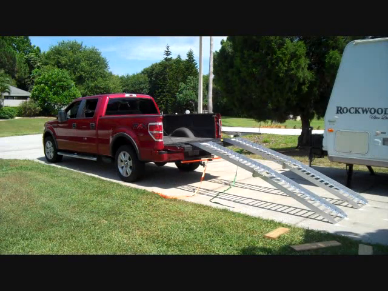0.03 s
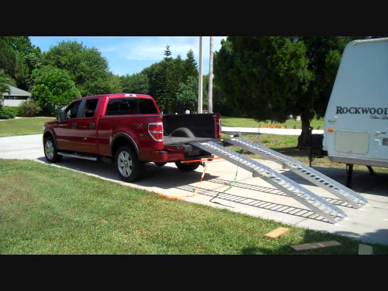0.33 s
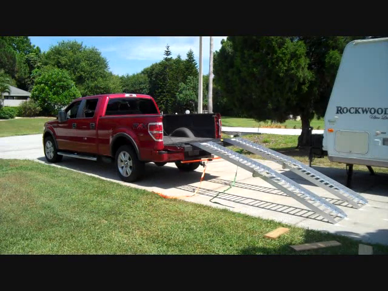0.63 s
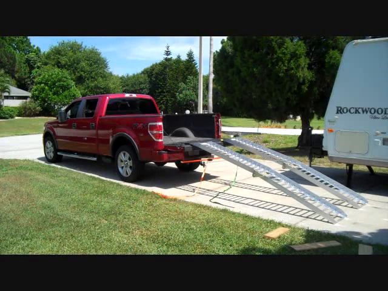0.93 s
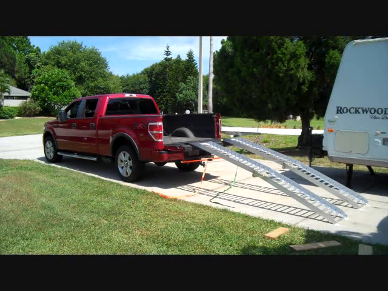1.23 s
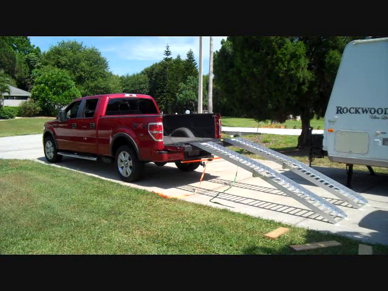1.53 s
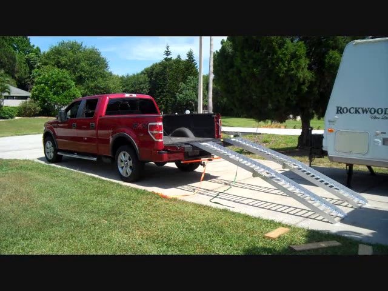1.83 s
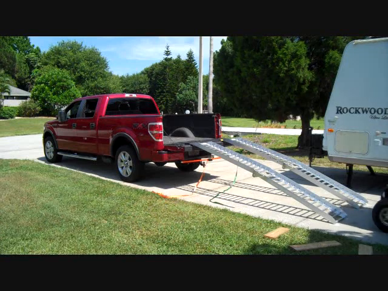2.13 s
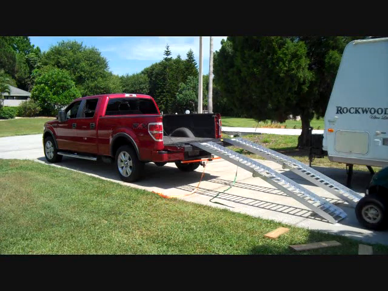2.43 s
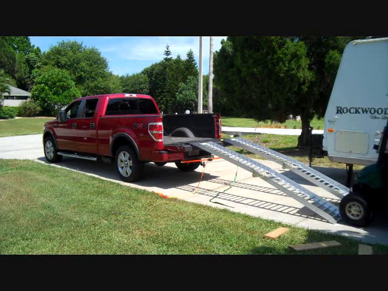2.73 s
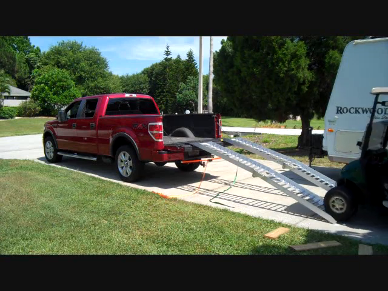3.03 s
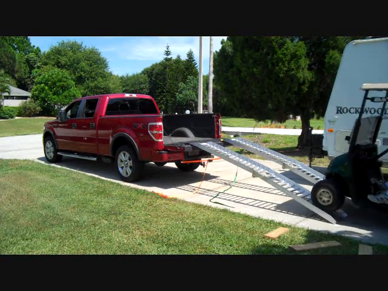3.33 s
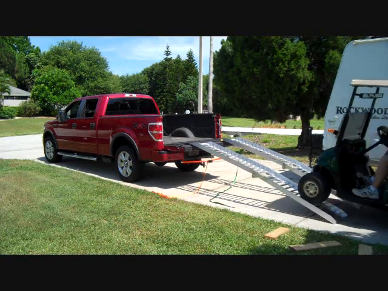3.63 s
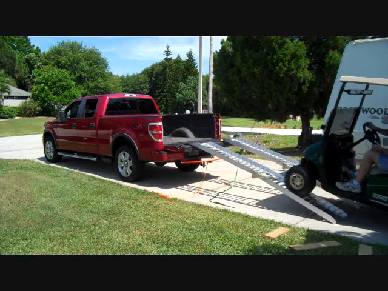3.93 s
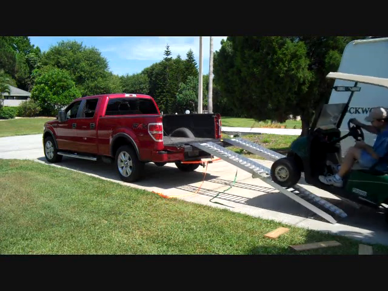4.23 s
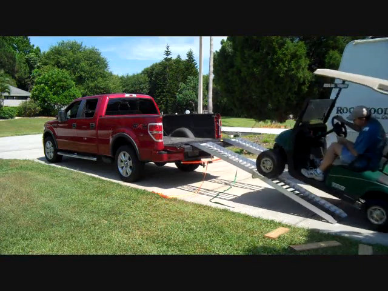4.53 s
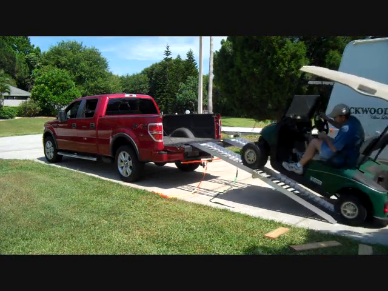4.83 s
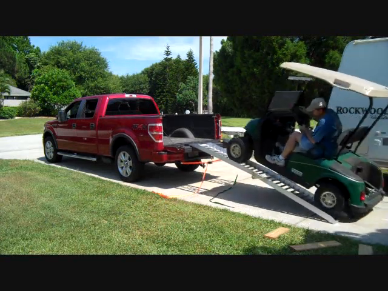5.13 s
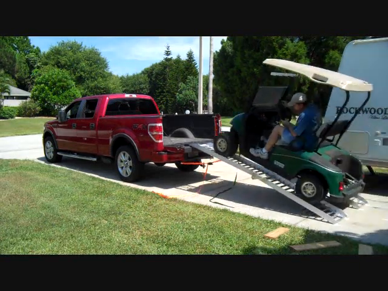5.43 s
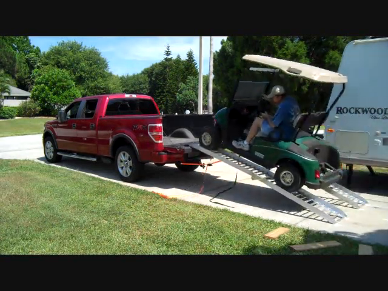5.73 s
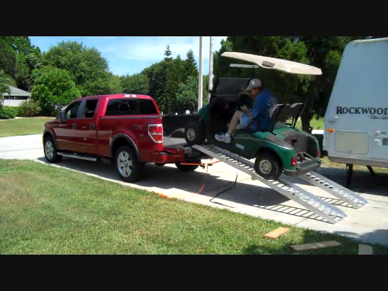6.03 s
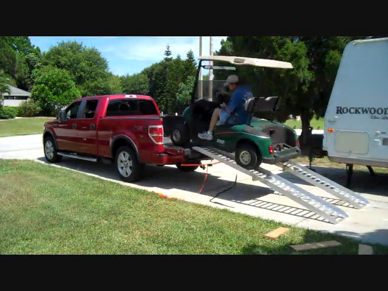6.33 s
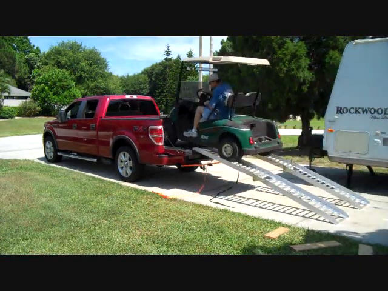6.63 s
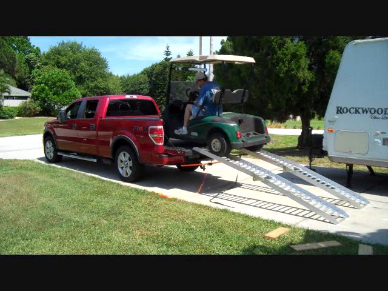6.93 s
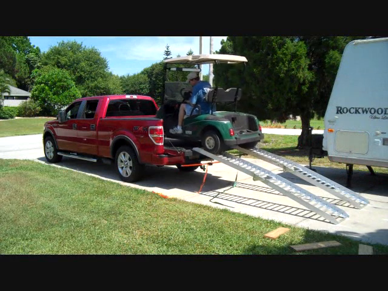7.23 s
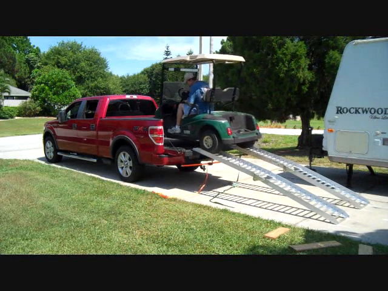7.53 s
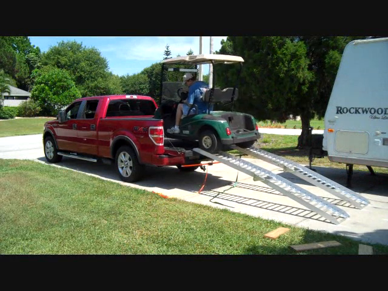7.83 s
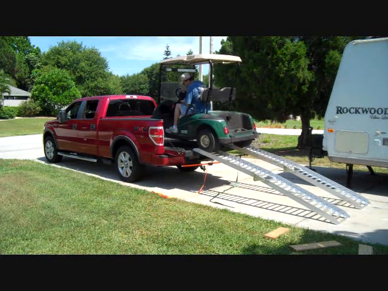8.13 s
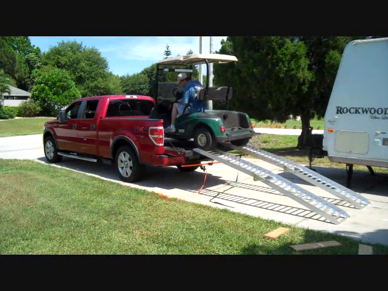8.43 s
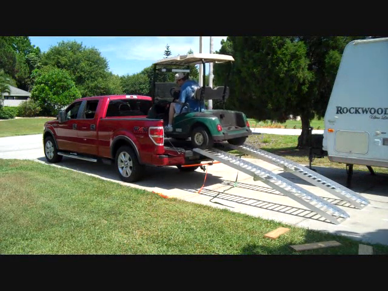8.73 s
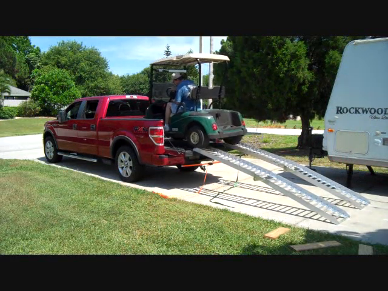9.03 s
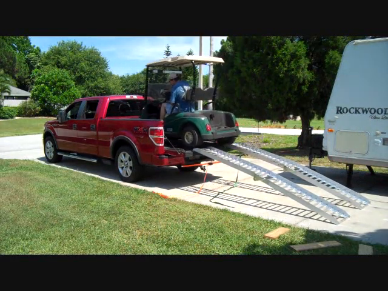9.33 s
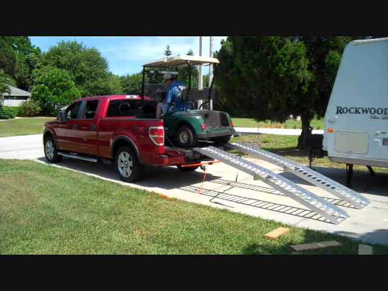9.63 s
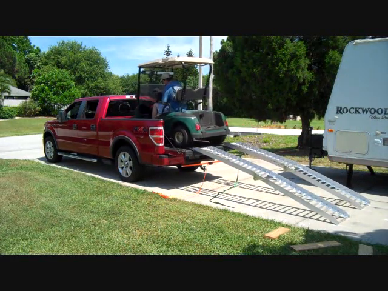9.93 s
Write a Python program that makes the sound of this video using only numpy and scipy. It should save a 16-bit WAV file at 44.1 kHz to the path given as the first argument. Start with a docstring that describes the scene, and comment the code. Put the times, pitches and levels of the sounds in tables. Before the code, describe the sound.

Outdoors, a brake pedal clicks off over a steady hiss and faint bird chirps. Tyres roll softly, then an electric golf cart hits metal ramps with a ringing clatter. Light rattles follow as it climbs, and wind rumbles and thumps on the microphone. The ramps then scrape and knock under the load several times, ending with a clank and a small pedal click.

```python
"""An electric golf cart climbs two aluminium ramps into a pickup bed on a breezy driveway.
The brake clacks off and the tyres roll; impacts excite the modes of rungs and rails, which clatter,
clang and hum, and stick-slip friction makes the loaded ramps scrape. Turbulent gusts buffet the two
microphone ports, and birds call in gliding tones over a steady outdoor hiss."""
import sys
import numpy as np
from scipy import signal
from scipy.fft import rfft, irfft, next_fast_len
from scipy.io import wavfile

SR = 44100
rng = np.random.default_rng(int(sys.argv[2]) if len(sys.argv) > 2 else 0)


def materialize(psi):
    """Save the field psi as 16-bit PCM at rate SR to the path in sys.argv[1].

    A 1-D psi becomes a single channel; in a 2-D psi each row is a channel.
    """
    bounded = np.clip(np.atleast_2d(psi).T, -1, 1)
    quanta = np.round(bounded * 32767).astype(np.int16)
    wavfile.write(sys.argv[1], SR, quanta)


N = 440559
T = np.arange(N) / SR


def from_db(db):
    """Amplitude grows tenfold every 20 dB. Table levels are relative, ahead of each source's gain."""
    return np.exp(np.asarray(db) * (np.log(10) / 20))


def unit_rms(x):
    """Normalisation to a mean power of one."""
    return x / np.sqrt(np.mean(x ** 2) + 1e-20)


def in_time(rows, column=1):
    """Linear interpolation of one column at every sample."""
    return np.interp(T, np.array(rows)[:, 0], np.array(rows)[:, column])


def at_hz(points, hz):
    """Interpolation on a log-frequency axis."""
    return np.interp(np.log(hz + 1e-6), np.log(np.array(points)[:, 0]), np.array(points)[:, 1])


def panned(pan_db):
    """Constant-power panning: two gains from the pan, the level of left over right."""
    ratio = np.atleast_1d(from_db(pan_db))
    return np.array([ratio, np.ones_like(ratio)]) / np.sqrt(1 + ratio ** 2)


def drift(corner_hz):
    """Low-pass filtered noise: a smooth random fluctuation of unit rms."""
    pole = np.exp(-40 * np.pi * corner_hz / SR)  # at one twentieth of the sample rate
    slow = signal.lfilter([1], [1, -2 * pole, pole * pole], rng.standard_normal(N // 20 + 2002))[2000:]
    return np.interp(np.arange(N) / 20, np.arange(len(slow)), unit_rms(slow))


def held(start, length, rise_s, fall_s):
    """Linear attack, hold and exponential decay: an envelope's sample indices and heights."""
    at = np.arange(max(int(start * SR), 0), min(int((start + length) * SR) + SR // 3, N))
    age = T[at] - start
    return at, np.clip(age / rise_s, 0, 1) * np.exp(-np.maximum(age - length, 0) / fall_s)


def contacts(per_s, spread_db):
    """Shot noise: tiny metal contacts of uneven size arrive as a Poisson process."""
    sizes = from_db(spread_db * np.minimum(rng.exponential(1, N), 4)) * rng.choice([-1, 1], N)
    return unit_rms(sizes * (rng.random(N) < per_s / SR))


def impact_force(rows, rise_s):
    """Contact force builds as the metal beds in, then decays; overlapping impacts add in power."""
    power = np.zeros(N)
    for start, db, decay_s in rows:
        at = int(start * SR)
        t = T[:min(SR // 2, N - at)]
        shape = (1 - np.exp(-t / rise_s)) * np.exp(-t / decay_s)
        power[at:at + len(t)] += (from_db(db) * shape / shape.max()) ** 2
    return np.sqrt(power)


def resonate(drive, t60, tail_db, tail_t60, modes=(), modes_db=0):
    """Convolution with two random impulse responses: dense ring, any clear modes, outdoor tail."""
    t = T[:SR]
    dense = unit_rms(rng.standard_normal((2, SR)) * from_db(-60 * t / t60))
    tail = unit_rms(rng.standard_normal((2, SR)) * from_db(-60 * t / tail_t60))
    clear = np.zeros((2, SR))
    for hz, db, mode_t60 in modes:
        clear += from_db(db - 60 * t / mode_t60) * np.sin(2 * np.pi * (hz * t + rng.random((2, 1))))
    response = unit_rms(dense + from_db(modes_db) * unit_rms(clear) + from_db(tail_db) * tail)
    return signal.fftconvolve(drive[None], response / np.sqrt(SR), axes=1)[:, :N]


def at_ports(pair, spectrum, direction):
    """Partial coherence: two independent signals are coloured and blended into left and right."""
    size = next_fast_len(N + SR // 10)
    hz = np.arange(size // 2 + 1) * SR / size
    pan_db, coherence, phase = (at_hz(table, hz) for table in direction)
    common, separate = rfft(pair, size)
    left_gain = from_db(pan_db) * np.exp(1j * phase)
    left = left_gain * (coherence * common + np.sqrt(1 - coherence ** 2) * separate)
    mid_gain = np.sqrt(1 + abs(left_gain) ** 2 + 2 * coherence * left_gain.real) / 2
    colour = unit_rms(from_db(at_hz(spectrum, hz))) / mid_gain  # the ports' mean keeps the level
    return irfft(colour * np.array([left, common]), size)[:, :N]


# Sound from all around. Each row: frequency in Hz, then in turn pan in dB, coherence from 0 to 1,
# or phase lead of the left port in radians.
AMBIENT_PAN = [(300, -0.5), (1500, -1.5), (4000, -4.5), (6200, -11.5), (7200, 1), (8300, 15.5), (10000, 8),
               (14000, 0.5)]
AMBIENT_COHERENCE = [(150, .2), (700, .75), (2000, .45), (4000, .33), (8000, .38), (11000, .1)]
AMBIENT_PHASE = [(600, 0), (2000, -1.6), (4000, -3), (7500, -2.8), (9000, -5.5)]
FROM_AROUND = (AMBIENT_PAN, AMBIENT_COHERENCE, AMBIENT_PHASE)
# The strength of the hiss. Each row: time in seconds, level in dB.
HISS_LEVEL = [(0, -45), (1.2, -44), (1.8, -42.5), (3.5, -41.5), (5.3, -42), (5.6, -42.5), (6.1, -39.5),
              (8.3, -45), (9.99, -43)]
# Its colour. Each row: frequency in Hz, spectral density in dB.
HISS_SPECTRUM = [(24, -25), (40, -5), (107, -2), (171, -7), (506, -5.5), (983, -5), (1140, -10),
                 (1910, -13), (3810, -11.5), (6230, -5), (8170, -4.5), (9240, -10), (11800, -30),
                 (13400, -26.5), (14400, -37)]


def outdoor_hiss():
    """Broadband ambient noise reaches the ports partly coherent, its level wavering slightly."""
    level_db = in_time(HISS_LEVEL) + .45 * drift(6)
    return at_ports(rng.standard_normal((2, N)) * from_db(level_db), HISS_SPECTRUM, FROM_AROUND)


# Lone whistles. Each row: start in seconds, level in dB, then the note: length in seconds,
# first pitch, last pitch and trill depth in Hz.
LONE_WHISTLES = [(.86, -47, .12, 3520, 3520, 0), (1.001, -45, .035, 3100, 2860, 250),
                 (8.81, -47, 0.071, 2520, 2365, 0)]
# One bird's buzzy calls. Each row: start in seconds, level in dB.
BUZZ_CALLS = [(0, -47.5), (.508, -44), (.69, -43.5)]
# Its two simultaneous voices. Each row: a note as above.
BUZZ_NOTES = [(.066, 4660, 4400, 230), (.066, 3840, 3650, 200)]
# A warbler swoops down and up in turn. Each row: start and end in seconds, first level in dB.
WARBLE_PHRASES = [(5.075, 5.46, -40), (6.027, 6.2, -35)]
# A third bird chirps in threes. Each row: start in seconds, level in dB.
CHIRP_TRIPLETS = [(8.162, -47.5), (8.912, -44.5)]
DOWNSWOOP, UPSWOOP, CHIRP = (0.01, 4000, 2850, 0), (0.01, 3617, 4080, 0), (0.0594, 3100, 2870, 70)


def bird_notes(warble_period_s=.109, growth_db_per_s=12, upswoop_delay_s=.06, chirp_period_s=.087):
    """Periodic repetition builds phrases from notes; the rows are laid out like the whistles."""
    notes = list(LONE_WHISTLES) + [(s, db, *voice) for s, db in BUZZ_CALLS for voice in BUZZ_NOTES]
    for start, end, first_db in WARBLE_PHRASES:
        for s in np.arange(start, end, warble_period_s):
            db = first_db + growth_db_per_s * (s - start)
            notes += [(s, db, *DOWNSWOOP), (s + upswoop_delay_s, db - 3, *UPSWOOP)]
    return notes + [(s + k * chirp_period_s, db, *CHIRP) for s, db in CHIRP_TRIPLETS for k in range(3)]


def birds(trill_per_s=75, waver_hz=45):
    """Frequency modulation makes tones glide, waver and trill; scattering in the trees blurs them."""
    song, waver = np.zeros(N), waver_hz * drift(127)
    for start, db, length, first_hz, last_hz, trill_hz in bird_notes():
        at, progress = int(start * SR), np.linspace(0, 1, int(length * SR))
        note = slice(at, at + len(progress))
        glide = first_hz + (last_hz - first_hz) * progress
        trill = trill_hz * signal.sawtooth(2 * np.pi * trill_per_s * length * progress)
        cycles = np.cumsum(glide - trill + waver[note]) / SR
        song[note] += from_db(db) * np.sqrt(abs(np.sin(np.pi * progress))) * np.sin(2 * np.pi * cycles)
    trees = resonate(song, t60=0.076, tail_db=3, tail_t60=0.5)
    return from_db(4) * panned(-0.5) * (song + from_db(-1) * trees)


# The light breeze. Each row: time in seconds, level in dB, pan in dB.
BREEZE_LEVEL = [(0, -49.5, -13), (1.1, -55, 0), (2.3, -62.5, 0), (4.7, -60.5, -3), (5.4, -47, -14),
                (6.6, -43, -12), (7.15, -35, -14), (7.45, -50.5, -13), (8.4, -47, -21), (9.1, -62, -10),
                (9.9, -50, -20)]
# Gusts on the ports. Each row: start and length in seconds, level in dB, pan in dB.
WIND_GUSTS = [(0, 0.019, -43, -7), (.46, .05, -40, -4), (0.563, 0.056, -34, -3), (1.373, 0.14, -45.5, 12),
              (1.78, 0.087, -38, -5), (1.86, 0.18, -39, 23), (2.53, 0.037, -36, -7), (2.69, 0.13, -44, 23),
              (2.99, .09, -42, 1), (3.19, .11, -42, -5), (3.46, .03, -44, -9), (3.606, .13, -43.5, 4),
              (4.048, .07, -37, -0.5), (4.881, 0.058, -38, -24), (5.031, .11, -29.5, -6),
              (5.19, .19, -23, -7), (5.361, 0.24, -20.8, -6), (5.68, .18, -23.2, -8.5),
              (5.948, .11, -30.5, -29), (6.06, .11, -26, -31), (6.285, 0.16, -35.5, -8),
              (6.915, 0.29, -26.5, -13.5), (7.639, 0.13, -35.5, -16), (8.185, 0.27, -26, -32)]


def wind_pressure(swing_db=3, lull_hz=4.5):
    """Incoherent addition: gusts and a wandering breeze sum in power at each port."""
    lulls_db = swing_db * np.array([drift(lull_hz), drift(lull_hz)])
    power = (from_db(in_time(BREEZE_LEVEL) + lulls_db) * panned(in_time(BREEZE_LEVEL, column=2))) ** 2
    for start, length, db, pan_db in WIND_GUSTS:
        at, shape = held(start, length, rise_s=0.037, fall_s=0.043)
        power[:, at] += (from_db(db) * panned(pan_db) * shape) ** 2
    return 2 * np.sqrt(power)


# The colour of strong wind. Each row: frequency in Hz, spectral density in dB.
BUFFET_SPECTRUM = [(13, -45), (22, -9.5), (123, 4.5), (173, 3), (503, -11), (544, -15), (825, -25),
                   (911, -22), (1030, -32), (1620, -36), (2500, -46), (3250, -62), (5500, -120)]


def buffeting(pressure, strong_db=-22, steepening=0.27, eddy_limit_db=5, sputter_limit_db=8):
    """Turbulence: each port has its own eddies; harder wind is brighter, and the upper bands sputter."""
    eddies_db = eddy_limit_db * np.tanh(np.array([drift(18), drift(37)]) / 2)
    push_db = 20 * np.log10(pressure + 1e-9) - strong_db + eddies_db
    sputter_db = sputter_limit_db * np.tanh(np.array([drift(96), drift(83)]) / 2)
    edges = np.geomspace(22, 2800, 12)
    centres = np.sqrt(edges[1:] * edges[:-1])
    shares = from_db(at_hz(BUFFET_SPECTRUM, centres)) * np.sqrt(np.diff(edges))
    white, out = rng.standard_normal((2, 2, N)), 0
    for k, (hz, share) in enumerate(zip(centres, shares / np.linalg.norm(shares))):
        bandpass = signal.butter(2, edges[k:k + 2], "band", fs=SR, output="sos")
        band = unit_rms(signal.sosfilt(bandpass, white[k % 2]))
        octaves = np.log2(hz / 130)
        band_db = push_db * (1 + steepening * octaves) + sputter_db * np.clip(octaves / 2, 0, 1.5)
        out = out + share * band * from_db(band_db)
    return from_db(strong_db) * out


# The hardest puffs. Each row: time in seconds, peak in dB, pan in dB.
HARD_PUFFS = [(.613, -17.5, -18), (5.348, -4.5, -19), (5.396, -9, 3), (5.41, -3.5, -24), (5.439, -8, -12),
              (5.4612, 3.5, -41), (5.554, -5, 15), (5.831, -8, -15), (6.125, -11, -22), (8.25, -13, -25),
              (8.387, -9, -20), (8.454, -10, -31)]


def puffs(pressure, per_s=5.5, over_wind_db=1.5, half_width_s=0.00049):
    """A single eddy thumps a port as a pressure pulse; the random ones scale with the wind."""
    kicks = from_db(over_wind_db) * pressure * (rng.random((2, N)) < per_s / SR)
    for s, db, pan_db in HARD_PUFFS:
        kicks[:, round(s * SR)] += from_db(db) * panned(pan_db)[:, 0]
    t = T[:SR // 50]
    offset = (t - t.mean()) / half_width_s
    pulse = (1 - offset ** 2) * np.exp(-offset ** 2 / 2)
    return signal.fftconvolve(kicks, [pulse], "same", axes=1)


# Ticks at the microphone. Each row: start in seconds, level in dB, pan in dB, centre and bandwidth
# in Hz, phase lead of the right port in radians.
CLOSE_TICKS = [(.7273, 2.5, -3, 3000, 2000, 2.6), (5.4612, 16, 18, 5000, 7000, 0)]


def ticks():
    """Heavily damped oscillation: the wider the bandwidth, the shorter the dry tick."""
    out, t = np.zeros((2, N)), T[:SR // 50]
    for start, db, pan_db, hz, width_hz, lead in CLOSE_TICKS:
        at = round(start * SR)
        swing = np.sin(2 * np.pi * hz * t + np.array([[0], [lead]]))
        out[:, at:at + len(t)] += from_db(db) * panned(pan_db) * np.exp(-np.pi * width_hz * t) * swing
    return out


# Sound from the cart and ramps. Each row: frequency in Hz, then in turn pan in dB, coherence
# from 0 to 1, or phase lead of the left port in radians.
CART_PAN = [(300, 0), (1500, -1.5), (4000, -2.5), (6000, -4.5), (7000, -1), (8000, 13.5), (9500, 8),
            (14000, 11.5)]
CART_COHERENCE = [(400, .93), (1100, .88), (2900, .52), (5000, .72), (7200, .82), (9000, .45), (14000, .18)]
CART_PHASE = [(500, 0), (2000, -.6), (4000, -1.5), (6000, -1.7), (7000, -1.1), (8300, -2.6), (10000, -4),
              (14000, -5.7)]
FROM_CART = (CART_PAN, CART_COHERENCE, CART_PHASE)
# The strength of the tread noise. Each row: time in seconds, level in dB.
TREAD_LEVEL = [(0, -58), (1.1, -55.5), (1.6, -53), (2.8, -51.5), (3.6, -52.5), (5, -45.5), (6.5, -41),
               (8, -57.5), (8.8, -56.5), (9.3, -44.5), (9.7, -44), (9.99, -45)]
# Its colour. Each row: frequency in Hz, spectral density in dB.
TREAD_SPECTRUM = [(150, -45), (250, -21), (301, -27), (323, -5.5), (462, 1.5), (1530, -5.5), (2630, -5),
                  (4000, -9), (5200, -20), (8800, -120)]


def tyres():
    """Rolling contact of tread on concrete and rungs makes a soft, slightly uneven noise."""
    level_db = in_time(TREAD_LEVEL) + 1.3 * drift(10)
    return at_ports(rng.standard_normal((2, N)) * from_db(level_db), TREAD_SPECTRUM, FROM_CART)


# Strikes of the brake pedal and latch. Each row: start in seconds, peak in dB, decay in seconds.
LATCH_STRIKES = [(.1653, -14.5, 0.0017), (.1754, -16.5, .0027), (.2, -32.5, .015), (.391, -21.5, 0.0016),
                 (9.849, -19.5, .0029)]
# Their colour. Each row: frequency in Hz, gain in dB.
LATCH_SPECTRUM = [(350, -46), (600, -19), (1040, -9), (1290, 0.5), (1610, -13), (2150, -2), (3560, -14),
                  (4450, -3.5), (7240, -6), (8600, -3.5), (14000, -43)]


def brake():
    """Brief impacts excite a wide band: the latch lets go, the pedal springs back and is later reset."""
    force = impact_force(LATCH_STRIKES, rise_s=0.00016) * contacts(per_s=9000, spread_db=1)
    pedal = resonate(force, t60=0.064, tail_db=-7, tail_t60=0.2)
    return from_db(-2.5) * at_ports(pedal, LATCH_SPECTRUM, FROM_CART)


# The cart's weight lands on the metal. Each row: start in seconds, peak in dB, decay in seconds.
HEAVY_BLOWS = [(3.028, -7.5, 0.018), (3.185, -26.5, 0.043), (7.21, -29, .025), (9.166, -32, 0.028),
               (9.599, -28.5, 0.023), (9.75, -19, 0.013)]
# Resonances of the side rails. Each row: frequency in Hz, level in dB, time to fall 60 dB in seconds.
RAIL_MODES = [(1660, 8, 0.16), (1717, -25.5, 0.69), (1706, -3.5, 0.67), (1970, -48, 0.5), (2520, -32, 0.26),
              (2480, -3.5, 0.26), (2708, 1, 0.099), (2767, -33, 0.19)]
# The colour of the clang. Each row: frequency in Hz, gain in dB.
RAIL_SPECTRUM = [(150, -33), (250, -16), (430, -14), (531, -7), (611, -13), (710, 1), (938, -1.5),
                 (1300, -7.5), (1720, -4), (1860, -4), (4000, -16), (5200, -45), (8800, -120)]


def rail_clang():
    """Modal response: the side rails ring as the cart's weight lands."""
    force = impact_force(HEAVY_BLOWS, rise_s=0.0025) * contacts(per_s=2200, spread_db=2)
    rails = resonate(force, t60=0.13, tail_db=-1, tail_t60=0.4, modes=RAIL_MODES, modes_db=-17.5)
    return from_db(-8.5) * at_ports(rails, RAIL_SPECTRUM, FROM_CART)


# Resonances of the whole span. Each row: frequency in Hz, level in dB, time to fall 60 dB in seconds.
BENDING_MODES = [(436, -14, 1.2), (655, -5.5, 1.1), (723, -3.5, 1.03), (796, -14, 1.5), (997, 1, 0.45),
                 (1054, -15, 3.2), (1175, -17.5, 1.15), (1184, -9.5, 1)]


def span_hum():
    """Free bending vibration keeps the long beams humming after each heavy blow."""
    out = np.zeros(N)
    for start, db, _ in HEAVY_BLOWS:
        at = int(start * SR)
        t = T[:min(2 * SR, N - at)]
        for hz, mode_db, t60 in BENDING_MODES:
            out[at:at + len(t)] += from_db(db + mode_db - 60 * t / t60) * np.sin(2 * np.pi * hz * t)
    return from_db(-24) * out


# A ramp slides under load. Each row: start and length in seconds, peak in dB, swell in dB
# (steady if zero or less).
RAMP_SLIDES = [(3.004, 0.019, -18.5, -0.5), (6.216, 0.45, -14.5, 5.5), (6.932, 0.104, -34.5, 7),
               (7.247, 0.096, -27.0, -0.5), (7.41, 0.053, -24, 1), (7.502, 0.57, -17.5, 10.5),
               (8.784, 0.1, -36.5, 3.5), (9.142, 0.029, -21.0, 0.0), (9.273, 0.074, -30.5, 2.5),
               (9.426, 0.098, -35, -1), (9.514, 0.22, -22.5, 9.5), (9.736, 0.12, -28.5, 1)]


def sliding_load():
    """The envelope of sliding friction: each slide bites, swells to its middle, eases and lets go."""
    power = np.zeros(N)
    for start, length, db, swell_db in RAMP_SLIDES:
        at, shape = held(start, length, rise_s=0.016, fall_s=0.024)
        off_middle = np.minimum(abs(2 * (T[at] - start) / length - 1), 1)
        power[at] += (from_db(db - max(swell_db, 0) * off_middle) * shape) ** 2
    return np.sqrt(power)


# High resonances of the rungs. Each entry: frequency in Hz.
RUNG_MODES_HZ = [2420, 3340, 3830, 4110, 4369, 4827, 4991, 5097, 5278, 5792, 6044, 6185, 6623, 6748, 7089,
                 7402, 7654, 7811, 7966]
# The colour of the scrape. Each row: frequency in Hz, gain in dB.
SCRAPE_SPECTRUM = [(350, -51), (600, -25), (772, -10), (1090, -22), (1650, -14), (2920, -13.5), (3250, -8),
                   (4070, -12.5), (4900, -4.5), (5530, -7), (6840, 0.5), (7920, -4), (11000, -23),
                   (13100, -25), (14400, -35)]


def ramp_scrape(rung_t60=0.083):
    """Stick-slip friction at its ends rings each ramp, while the load rocks between the two."""
    modes = [(hz, 0, rung_t60) for hz in RUNG_MODES_HZ]
    load, out = sliding_load(), 0
    rocking = np.pi / 4 + drift(10.4) / 2
    for share in (np.cos(rocking), np.sin(rocking)):
        slips = share * load * from_db(1.1 * drift(30)) * contacts(per_s=3500, spread_db=3.5)
        out = out + resonate(slips, t60=0.06, tail_db=-8.5, tail_t60=0.34, modes=modes, modes_db=-10)
    return from_db(-1.94) * at_ports(out, SCRAPE_SPECTRUM, FROM_CART)


def rattles(first_s=3.9, last_s=7.4, per_s=7, level_db=-31.5, spread_db=3, decay_s=.024):
    """A random point process: light knocks at loose intervals while the tyres cross the rungs."""
    gap_chance, level_chance = rng.random((80, 2)).T
    times = first_s + np.cumsum(.5 + gap_chance) / per_s
    levels = level_db + spread_db * (2 * level_chance - 1)
    return [(s, db, decay_s) for s, db in zip(times, levels) if s < last_s]


# Knocks on rungs and ramp seats. Each row: start in seconds, peak in dB, decay in seconds.
RUNG_KNOCKS = [(3.026, -14, 0.046), (3.066, -10.5, 0.019), (3.083, -14, 0.015), (3.144, -21.5, 0.051),
               (3.1833, -3.5, 0.011), (4.036, -20, 0.011), (4.3175, -16, 0.016), (4.51, -26.5, 0.019),
               (4.747, -23, 0.009), (4.7636, -22, 0.02), (4.854, -23, 0.014), (5.0056, -22.5, 0.098),
               (5.209, -27.5, 0.039), (5.6935, -29, 0.057), (5.98, -22.0, 0.014), (6.034, -21, 0.027),
               (6.1, -18.5, 0.037), (6.2427, -3, 0.0094), (6.456, -6.5, 0.034), (6.635, -13.0, 0.013),
               (6.669, -12.5, 0.024), (6.7496, -16.5, 0.025), (7.0733, -19, 0.012), (7.169, -15.0, 0.034),
               (7.2085, -5.5, 0.016), (7.411, -14, 0.018), (7.64, -12, 0.021), (8.0586, -16, 0.013),
               (8.6035, -23.5, 0.0055), (9.022, -27.5, 0.049), (9.164, -4.5, 0.016)]
# Their colour. Each row: frequency in Hz, gain in dB.
RUNG_SPECTRUM = [(530, -46), (900, -18.5), (1500, -35), (1650, -20), (2470, -12), (4160, -11), (4950, -6),
                 (5690, -5), (7010, 1.5), (11000, -23.5), (12700, -25), (14400, -32)]


def rung_clatter(rung_t60=0.14):
    """Impact excitation: the rungs ring as tyres knock them and the ramps jolt on their seats."""
    modes = [(hz, 0, rung_t60) for hz in RUNG_MODES_HZ]
    force = impact_force(RUNG_KNOCKS + rattles(), rise_s=0.0011) * contacts(per_s=2300, spread_db=3)
    rungs = resonate(force, t60=0.031, tail_db=-4.5, tail_t60=0.23, modes=modes, modes_db=-13.5)
    return from_db(-7.5) * at_ports(rungs, RUNG_SPECTRUM, FROM_CART)


def scene():
    """Superposition: the pressures of cart, yard and wind add at the two ports."""
    cart = rung_clatter() + ramp_scrape() + rail_clang() + span_hum() + brake() + tyres()
    yard = outdoor_hiss() + birds()
    pressure = wind_pressure()
    return cart + yard + buffeting(pressure) + puffs(pressure) + ticks()


def record(dry):
    """Hard clipping at full scale, then a steep low-pass filter cuts the top of the treble."""
    cutoff_hz = 14300
    lowpass = signal.ellip(10, .2, 80, cutoff_hz, fs=SR, output="sos")
    return signal.sosfilt(lowpass, np.clip(dry, -1, 1))


dry = scene()
out = record(dry)
materialize(out)
```